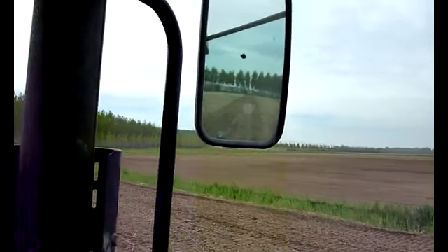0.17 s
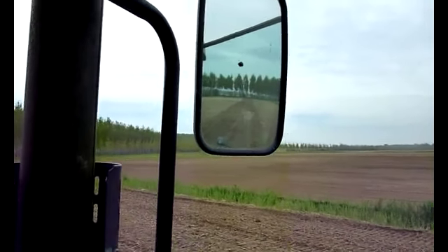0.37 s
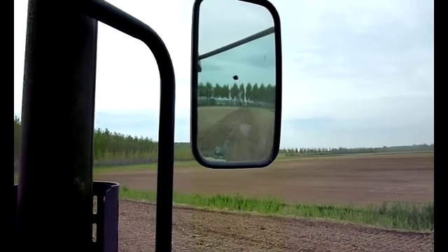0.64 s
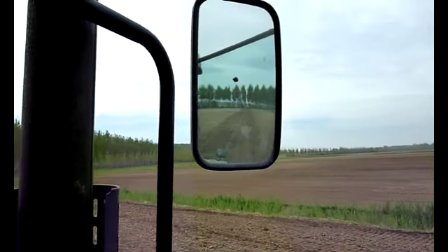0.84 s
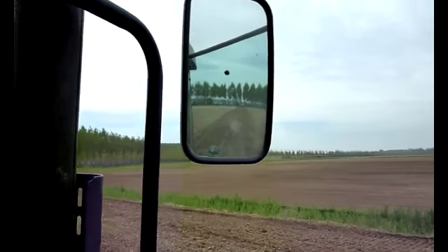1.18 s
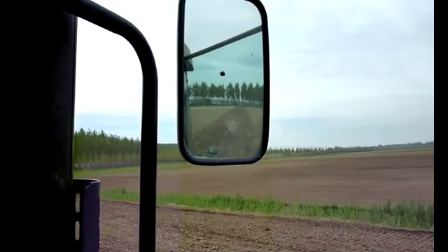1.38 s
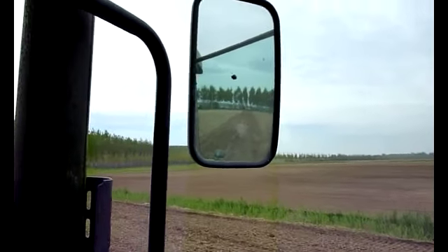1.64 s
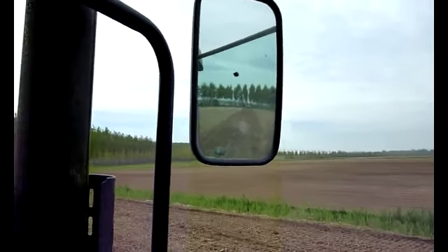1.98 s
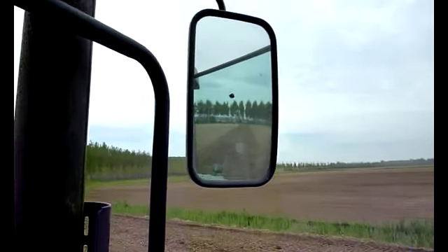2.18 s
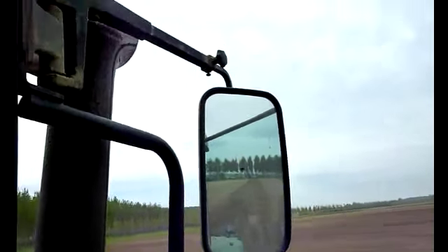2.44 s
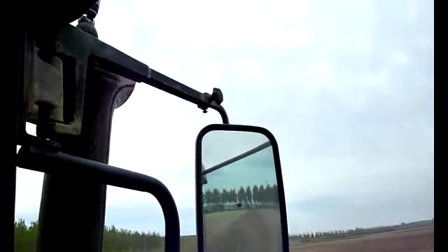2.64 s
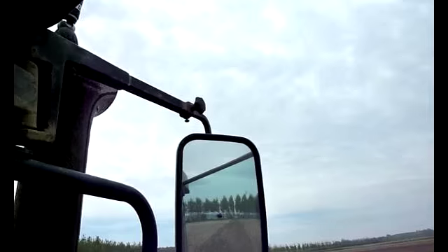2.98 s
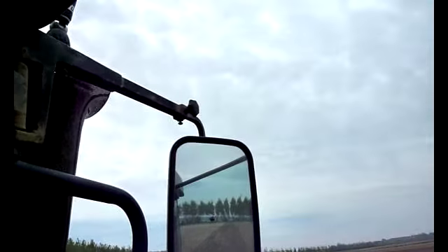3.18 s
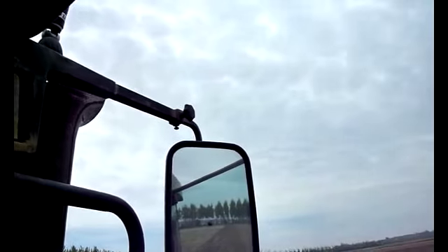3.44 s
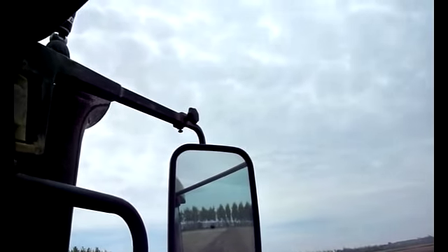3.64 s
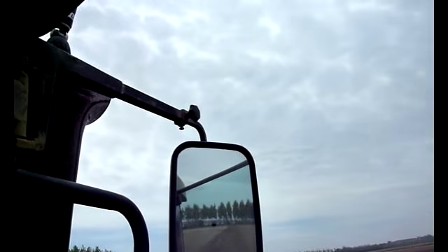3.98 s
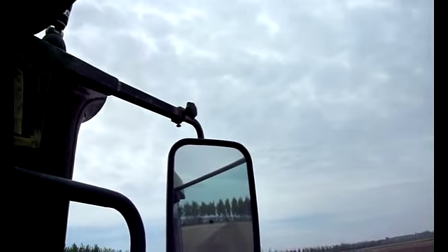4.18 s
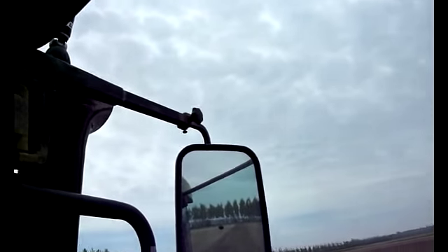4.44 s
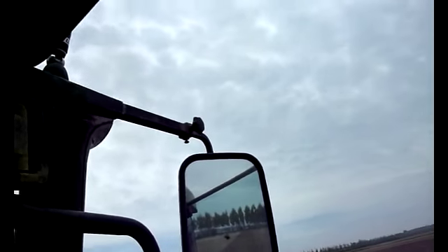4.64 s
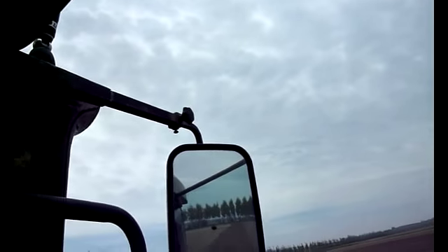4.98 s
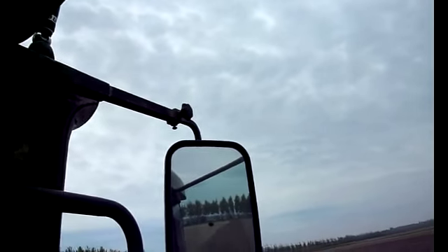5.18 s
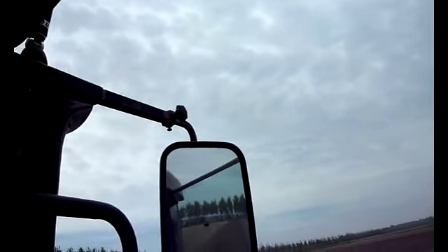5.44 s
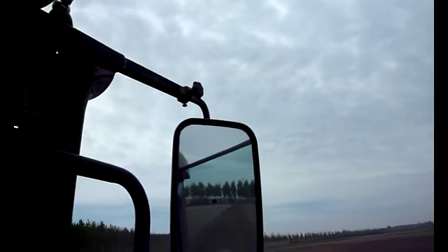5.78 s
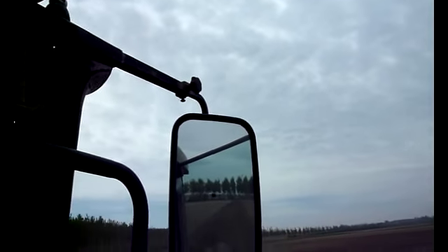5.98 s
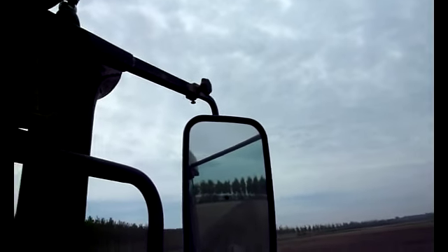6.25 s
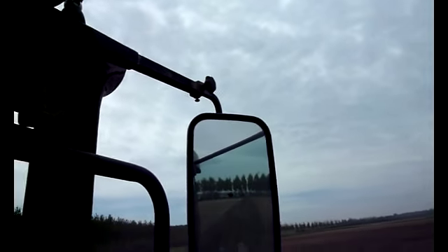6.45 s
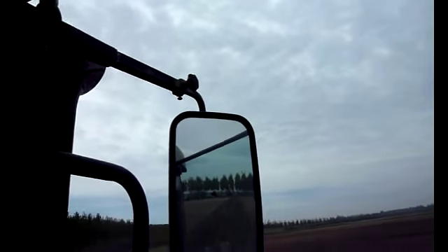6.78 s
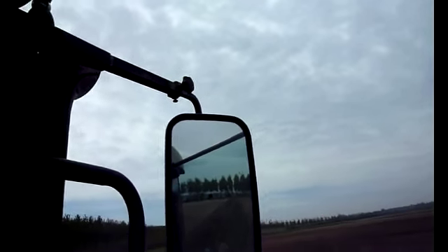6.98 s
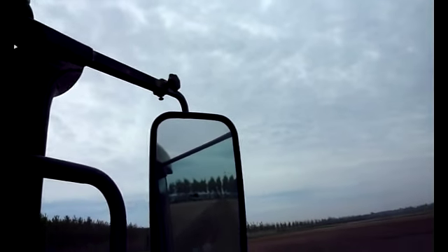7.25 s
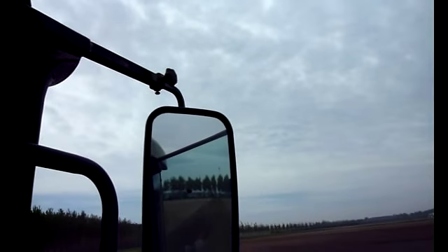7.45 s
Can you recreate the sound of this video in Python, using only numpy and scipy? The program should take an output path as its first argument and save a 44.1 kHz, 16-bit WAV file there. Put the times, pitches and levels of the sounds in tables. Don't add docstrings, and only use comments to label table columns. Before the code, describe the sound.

A tractor's six-cylinder diesel drones loudly inside the cab, slowing under load, then climbing back to its first speed, with steady clatter and rumble.

```python
import sys
import numpy as np
from scipy import signal
from scipy.fft import rfft, irfft
from scipy.io import wavfile
from scipy.ndimage import uniform_filter1d, map_coordinates

SR = 44100
rng = np.random.default_rng(int(sys.argv[2]) if len(sys.argv) > 2 else 0)


def undo_db(level):
    steps = np.asarray(level, float) / 20
    return 10 ** steps


def file_out(sig):
    cols = np.atleast_2d(sig).T
    lim = np.clip(cols, -1, 1)
    pcm = np.round(lim * 32767).astype(np.int16)
    wavfile.write(sys.argv[1], SR, pcm)


N = 336042
CYLINDERS = 6
FREQ = np.fft.rfftfreq(N, 1 / SR) + 1e-3


# [multiple of four-stroke cycle rate, level/dB]
BODY_ORDERS = [(2, -49.5), (8, -44), (9, -38.5), (10, -41.5), (11, -42), (14, -47.5), (15, -38.5),
               (20, -40.5), (22, -49.5), (24, -46)]


def boom(cycle, first_db, second_db):
    fire = CYLINDERS * cycle
    first = undo_db(first_db + 0.36 * walk(9)) * np.cos(fire)
    second = undo_db(second_db + 0.34 * walk(11)) * np.cos(2 * fire + np.pi)
    third = undo_db(second_db - 18.0 + 2.5 * walk(2.8)) * np.cos(3 * fire + 1.2)
    harmonics = np.sqrt(2) * (first + second + third)
    return harmonics + orders(cycle, BODY_ORDERS, wobble_db=2.5, slip=0.11)


def resonance_db(hz, centre_hz, half_hz, peak_db):
    return peak_db - 10 * np.log10(1 + ((hz - centre_hz) / half_hz) ** 2)


def orders(cycle, table, wobble_db, slip):
    start = rng.uniform(0, 2 * np.pi, len(table))
    total = 0
    for (multiple, db), phase in zip(table, start):
        size = np.sqrt(2) * undo_db(db + wobble_db * walk(3))
        total = total + size * np.cos(round(multiple) * cycle + phase + slip * walk(2))
    return total


# [f/Hz, level per Hz/dB]
GAS_SPECTRUM = [(150, -26.5), (250, -6.5), (350, -0.5), (450, -2), (550, -2.5), (700, -2.5), (850, -2.5),
                (1000, -5.5), (1200, -5.5), (1450, -7), (1700, -15.5), (2200, -23.5), (3000, -51.5)]
# [multiple of four-stroke cycle rate, level under the gas/dB]
STACK_ORDERS = [(28, -17), (30, -18.5), (36, -22.5), (44, -18.5), (48, -23), (50, -19), (56, -21),
                (58, -22), (66, -28), (74, -23)]
# [f/Hz, width/Hz, lift/dB]
STACK_MODES = [(302, 20, 11.5), (386.5, 43, 7.5), (454, 39, 7.5), (524, 30, 10.5), (606.6, 42, 9),
               (680.7, 44, 11), (765.6, 43, 11), (841, 48, 8.5), (920, 64, 9), (1000, 46, 9.5),
               (1064, 66, 3.5), (1140, 48, 7), (1217, 52, 7), (1296, 58, 7.5), (1377, 61, 7), (1501, 70, 6)]


def roar(cycle, db):
    gas = level(colour(each_turn(cycle, share=.07, renew=6.0), GAS_SPECTRUM), 0)
    gas = gas + orders(cycle, STACK_ORDERS, wobble_db=3.0, slip=0.88)
    beat = throb(cycle, firing=.13, lead=2.9, crank=.12, scatter_db=.55)
    ringing = irfft(rfft(gas) * modes(STACK_MODES), N)
    return level(ringing * beat, 0) * undo_db(db)


# [f/Hz, level per Hz/dB]
KNOCK_SPECTRUM = [(900, -14.5), (1700, 1.5), (2300, -2.5), (2700, -5.5), (3100, -4.5), (3600, -6.5),
                  (4000, -6), (4400, -8.5), (4800, -9), (5200, -12.5), (5600, -15.5), (6000, -18.5)]


def clatter(cycle, db):
    grains = each_turn(cycle, share=.1, renew=5.8) * undo_db(1.0 * walk(900))
    beat = throb(cycle, firing=.12, lead=.35, crank=.04, scatter_db=.55)
    return level(colour(grains * beat, KNOCK_SPECTRUM), 0) * undo_db(db)


def each_turn(cycle, share, renew):
    place = (cycle / np.pi * 1024).astype(int) % 1024
    first, other = rng.standard_normal((2, 1024))[:, place]
    drift = renew * np.cumsum(walk(4)) / SR
    rattle = np.cos(drift) * first + np.sin(drift) * other
    return np.sqrt(1 - share) * rng.standard_normal(N) + np.sqrt(share) * rattle


def throb(cycle, firing, lead, crank, scatter_db):
    count = (cycle * CYLINDERS / (2 * np.pi)).astype(int)
    strength = uniform_filter1d(rng.standard_normal(N // 100)[count], size=150)
    turn = np.cos(2 * cycle) + .5 * np.cos(4 * cycle + 1)
    return (1 + firing * np.cos(CYLINDERS * cycle + lead) + crank * turn) * undo_db(scatter_db * strength)


# [f/Hz, width/Hz, lift/dB]
UPRIGHT_PANELS = [(548, 55, 3.5), (1330, 200, 0.5), (1630, 98, 6), (2070, 220, 2), (4615, 160, 4)]
# [f/Hz, width/Hz, lift/dB]
TILTED_PANELS = [(1013, 93, 6.3), (1500, 220, 2.3), (1810, 200, 1.3), (2290, 120, 3.3), (3180, 250, 2.2)]


def window(x, delay_ms, share, tilt):
    dull = irfft(rfft(x) / (1 + (FREQ / 1880) ** 4), N)
    lag = delay_ms * SR / 1000
    echo = map_coordinates(dull, [np.arange(N) - lag], order=1, mode="nearest")
    again = map_coordinates(x - dull, [np.arange(N) - 2 * lag], order=3, mode="nearest")
    heard = rfft((x + share * echo + 0.18 * again) / np.sqrt(1 + share ** 2))
    upright = irfft(heard * modes(UPRIGHT_PANELS), N)
    tilted = irfft(heard * modes(TILTED_PANELS), N)
    return (1 - tilt) * upright + tilt * tilted


# [f/Hz, level per Hz/dB]
FLOOR_SPECTRUM = [(15, -21.5), (30, -9.5), (55, -9), (80, -4), (120, -2), (160, 0), (220, 2.5), (300, -2.5),
                  (400, -14.5), (600, -48)]


def rumble():
    return level(colour(rng.standard_normal(N), FLOOR_SPECTRUM), -30) * undo_db(2.7 * walk(1.5))


# [f/Hz, level/dB]
MIRROR = [(5512, 0), (5943, -6.5), (6373, -13.5), (6804, -22), (7235, -32.5), (7665, -49), (7900, -66),
          (9000, -73), (11000, -90), (13000, -95)]


def quarter_rate(x):
    step = 4
    low = irfft(rfft(x) * (FREQ < SR / step / 2), N)
    kept = low * step * (np.arange(N) % step == 1)
    return colour(kept, MIRROR)


# [f/Hz, level per Hz/dB]
HISS_SPECTRUM = [(6000, -17.5), (7400, 2.5), (8400, -0.5), (10400, -1), (11000, -6.5), (11800, -11.5),
                 (12300, -16.5), (12800, -19.5)]


def hiss(x):
    treble = np.sqrt(uniform_filter1d(np.diff(x, n=2, prepend=[0, 0]) ** 2, size=500))
    return level(colour(rng.standard_normal(N), HISS_SPECTRUM), -50.5) * treble


def level(x, db):
    return x * undo_db(db) / np.sqrt(np.mean(x ** 2))


def colour(x, points):
    hz, db = np.transpose(points)
    return irfft(rfft(x) * undo_db(np.interp(np.log(FREQ), np.log(hz), db)), N)


def walk(rate):
    k = int(SR / rate)
    held = np.repeat(rng.standard_normal(N // k + 1), k)
    return 1.062 * uniform_filter1d(uniform_filter1d(held, k), k)[:N]


def modes(table):
    power = 1
    for hz, width, db in table:
        power = power + (undo_db(db) ** 2 - 1) / (1 + (2 * (FREQ - hz) / width) ** 2) ** 2
    return np.sqrt(power)


# [t/s, firing rate f/Hz]
SPEED = [(0, 98.2), (.15, 97.8), (.75, 94.4), (1.55, 88.9), (2.15, 85.85), (2.55, 84.4), (2.75, 84.1),
         (3.15, 84.5), (3.4, 84.25), (3.75, 83.5), (4.25, 85.1), (4.55, 85.85), (5.35, 89.3), (5.95, 92.4),
         (6.75, 97.05), (6.95, 97.7), (7.62, 97.95)]
# [t/s, tilt 0-1]
TILT = [
    (0, 0.01),
    (2.3, 0.1),
    (2.75, 0.7),
    (3.5, 0.9),
    (5.5, 1),
    (6.2, 0.78),
    (7.62, 0.6),
]


def scene():
    t = np.arange(N) / SR
    hz = np.interp(t, *np.transpose(SPEED))
    tilt = np.clip(np.interp(t, *np.transpose(TILT)), 0, 1)
    cycle = np.cumsum(2 * np.pi * hz / CYLINDERS / SR)

    floor_db = resonance_db(hz, centre_hz=86.4, half_hz=16.5, peak_db=-17)
    cabin_db = resonance_db(2 * hz, centre_hz=172, half_hz=12.5, peak_db=-18.5)
    tones = boom(cycle, floor_db, cabin_db)

    sag = 98 - hz
    gas = roar(cycle, -18.0 - 0.1454 * sag)
    knock = clatter(cycle, -26.5 - 0.23 * sag - 1.52 * tilt)

    delay_ms = 1.623 + tilt * (1.333 - 1.623)
    share = 0.45 + tilt * (0.39 - 0.45)
    return (tones + window(gas + knock, delay_ms, share, tilt) + rumble())[None]


def low_pass(x):
    return signal.sosfilt(signal.butter(12, 12855, fs=SR, output="sos"), x)


def record(dry):
    from_start = np.arange(N)
    edge = np.minimum(1, np.minimum(from_start, from_start[::-1] + 6) / 60)
    mix = quarter_rate(dry[0] * edge) + hiss(dry[0])
    return low_pass(mix[None])


dry = scene()
out = record(dry)
file_out(out)
```